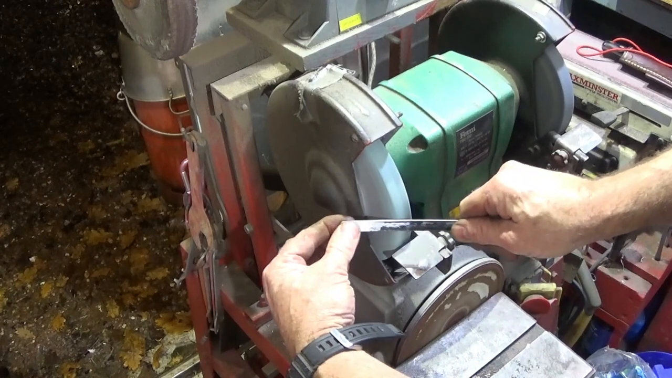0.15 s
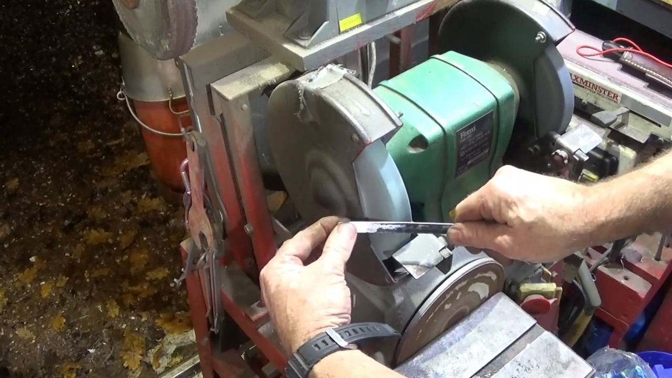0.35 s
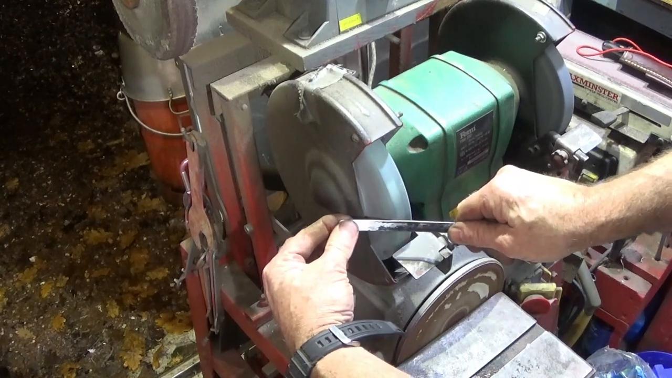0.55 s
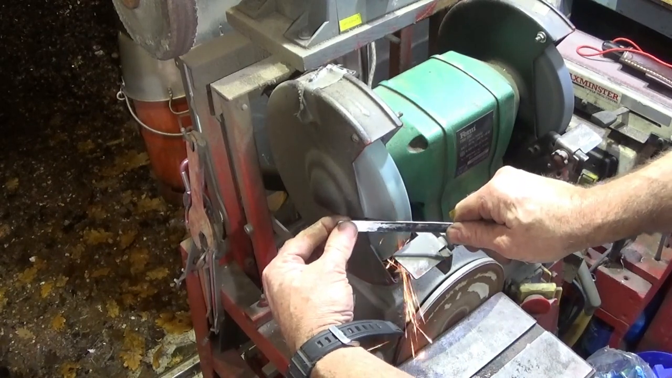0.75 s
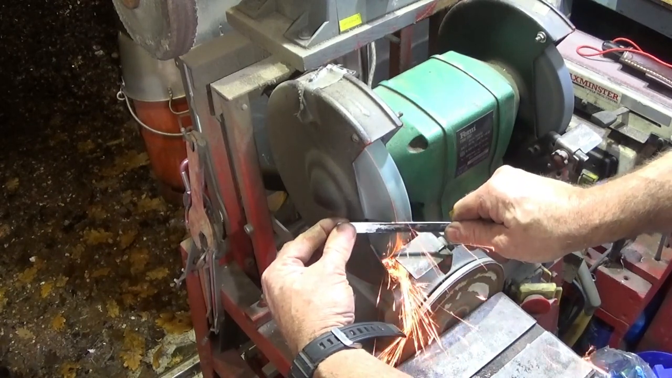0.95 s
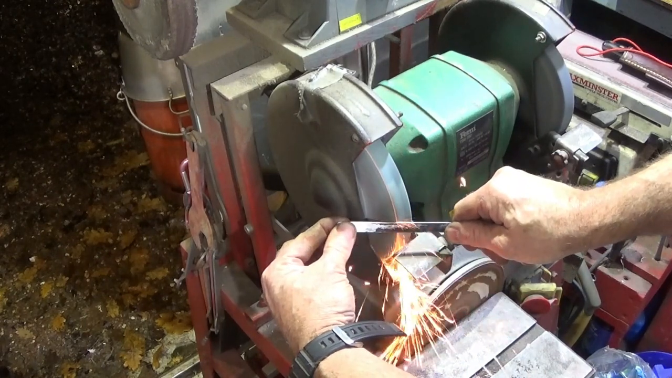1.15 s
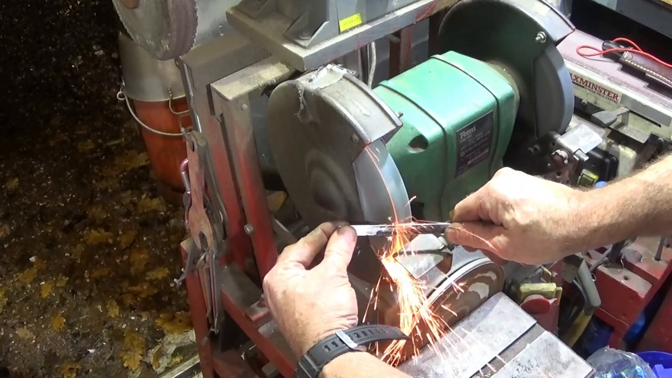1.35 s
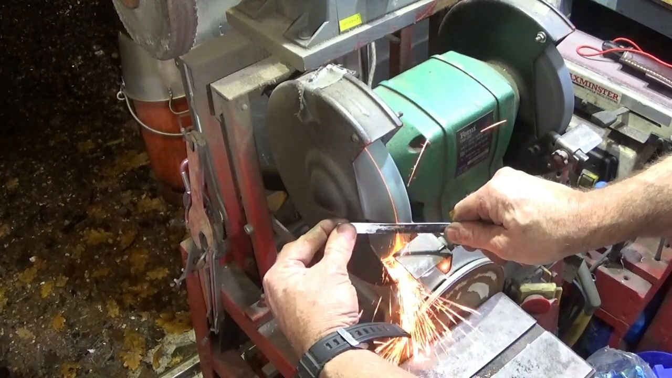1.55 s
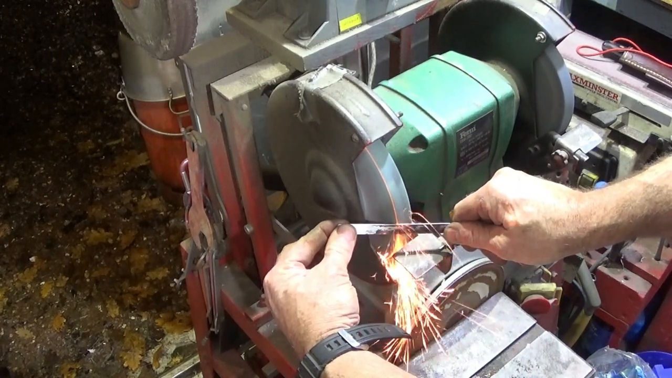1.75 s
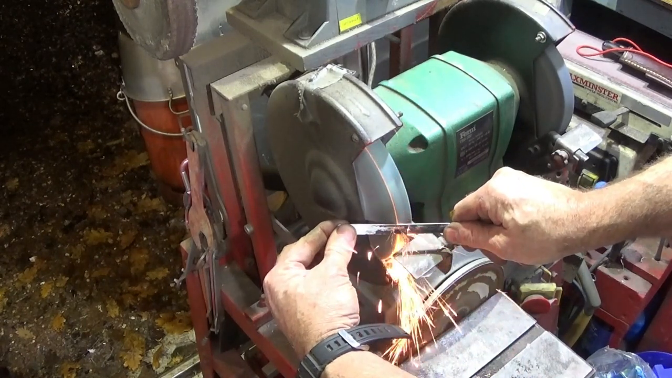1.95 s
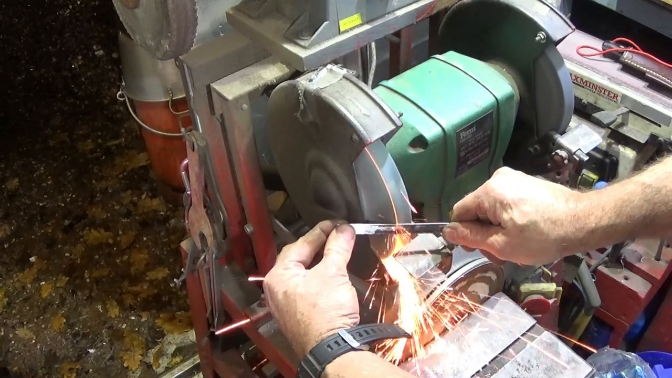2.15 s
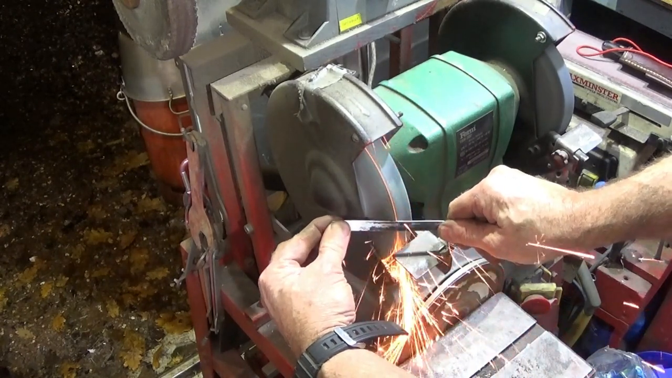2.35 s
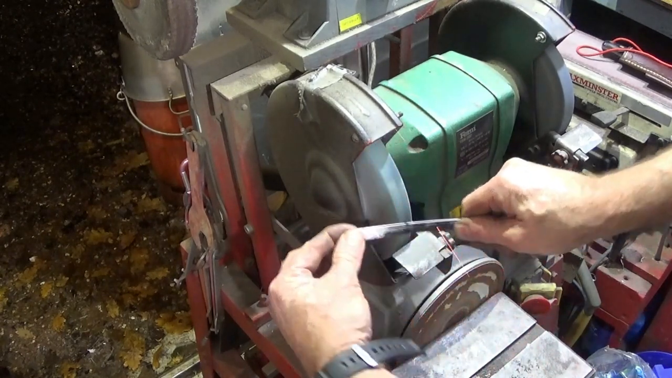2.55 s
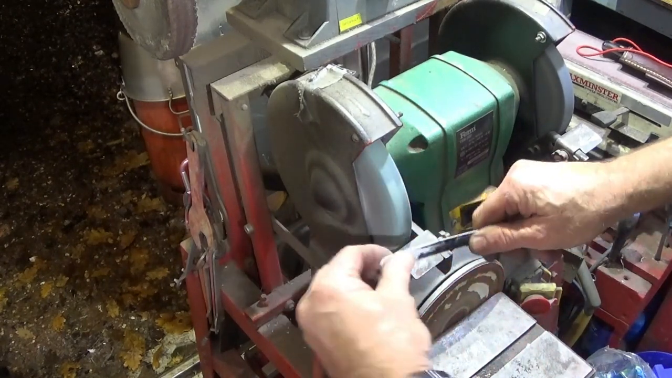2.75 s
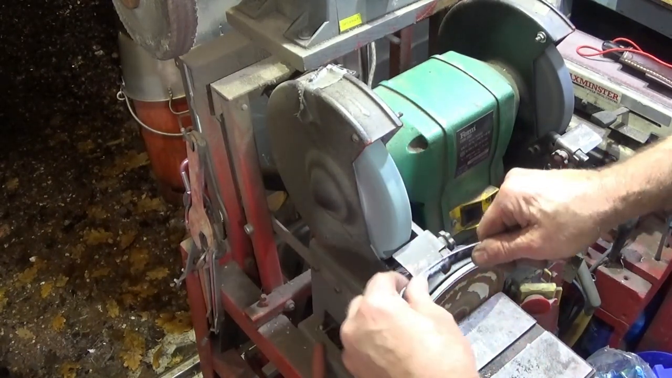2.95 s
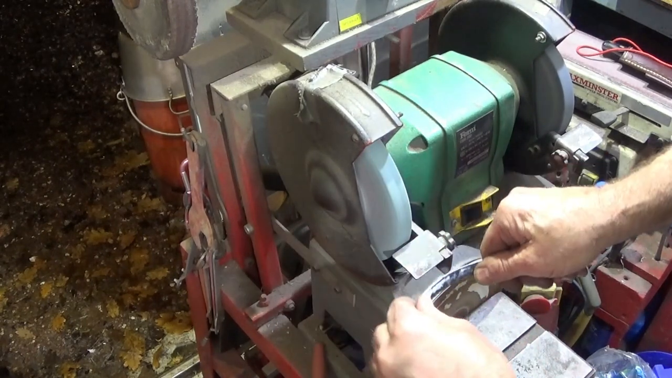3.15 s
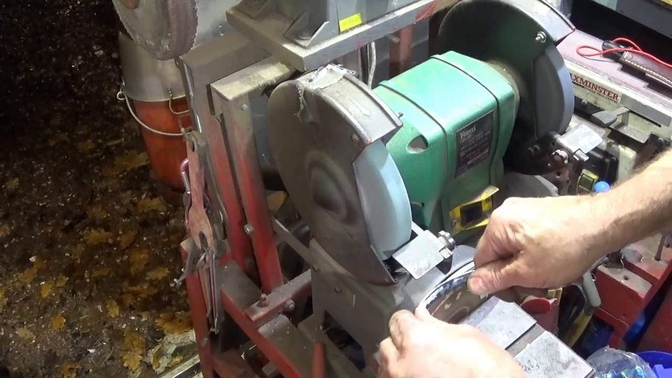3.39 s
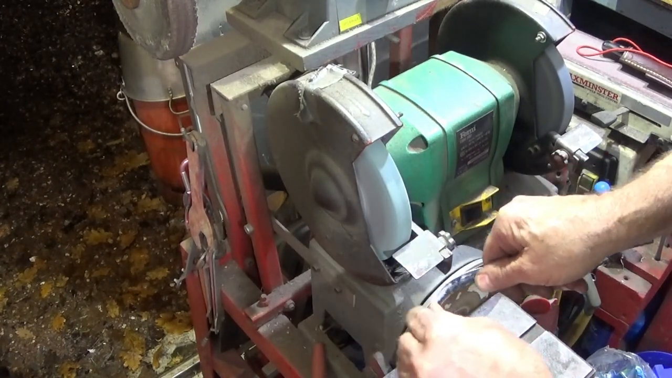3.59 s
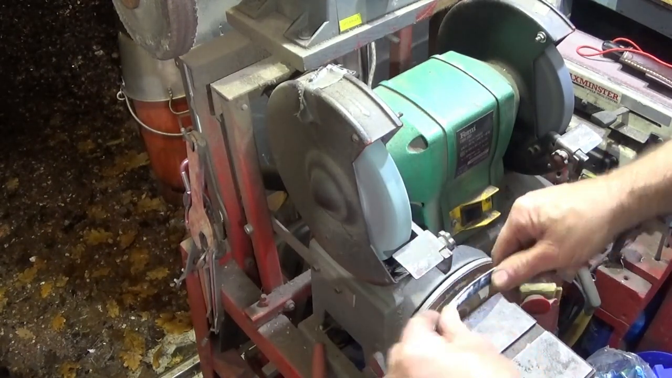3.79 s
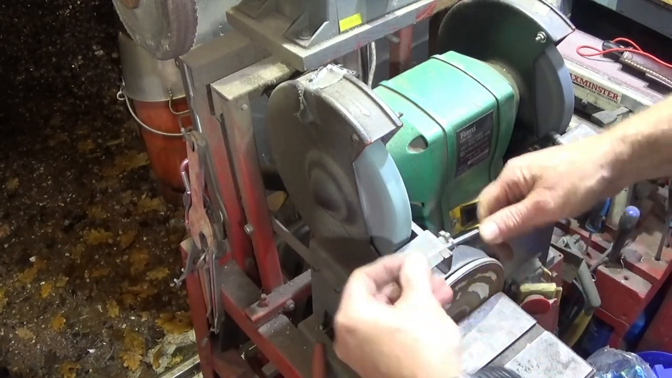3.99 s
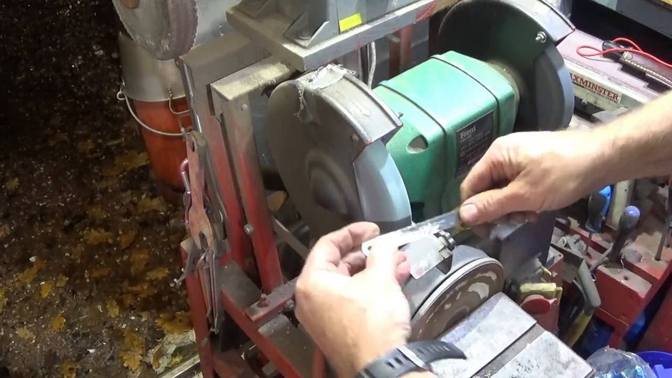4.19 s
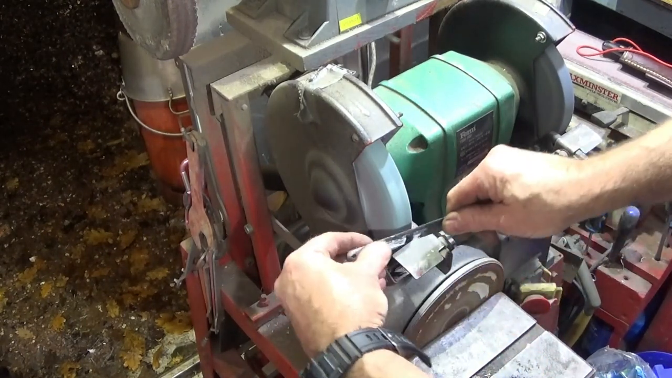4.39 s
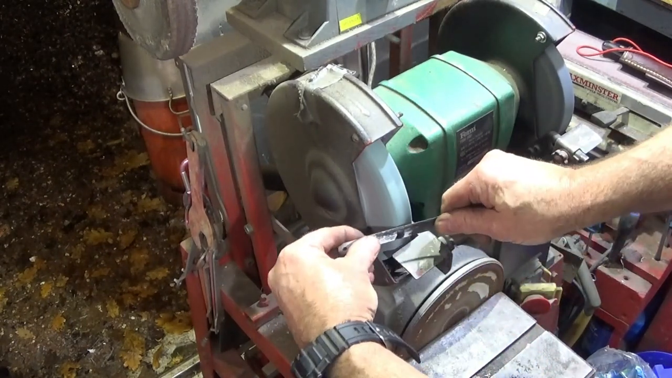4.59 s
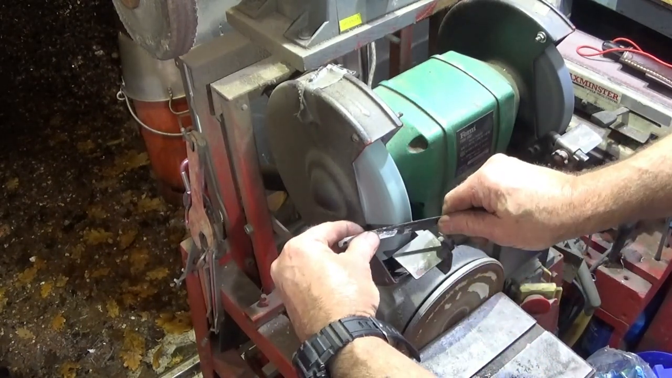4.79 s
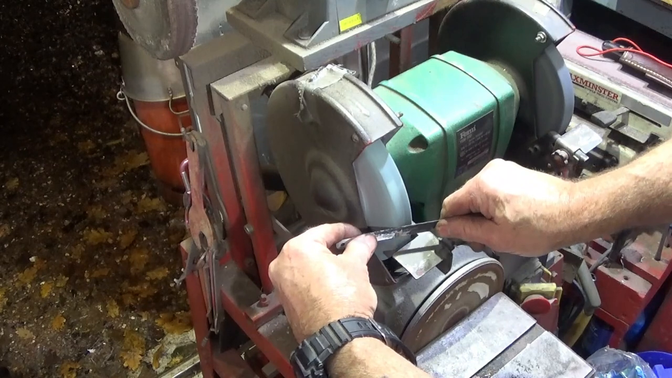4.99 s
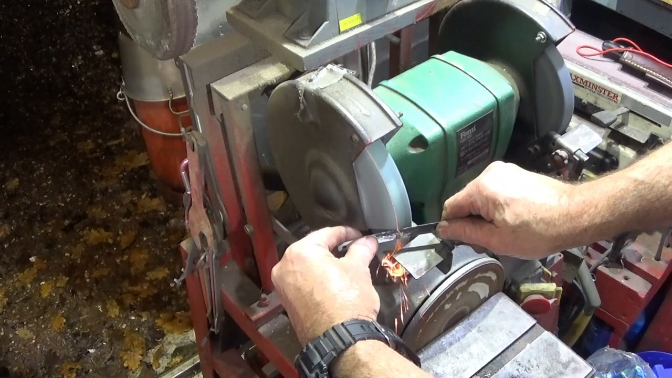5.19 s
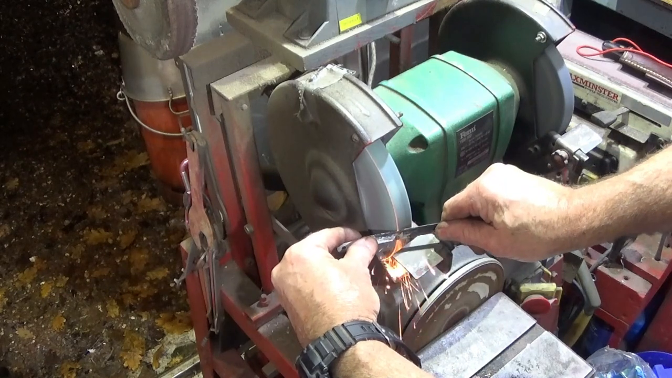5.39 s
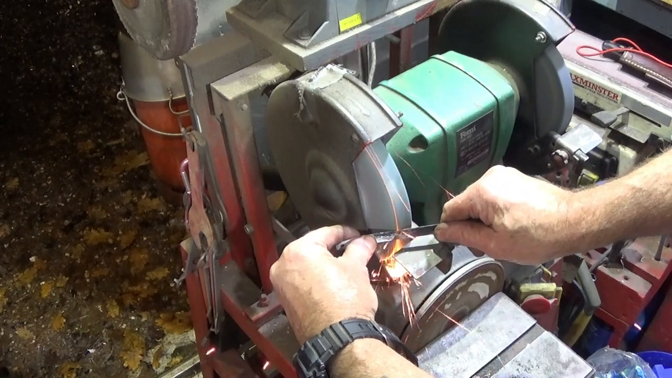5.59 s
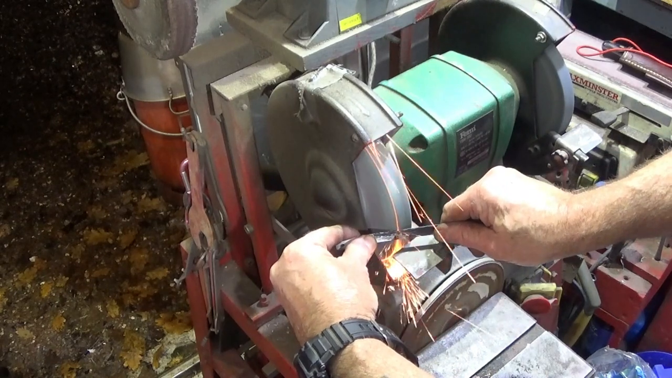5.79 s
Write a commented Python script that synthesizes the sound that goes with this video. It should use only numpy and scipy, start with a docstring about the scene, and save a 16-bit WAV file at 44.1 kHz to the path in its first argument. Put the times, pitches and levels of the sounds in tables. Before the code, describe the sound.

Close up in a small workshop, loose metal parts clatter as a bench grinder gathers speed. A steel blade is pressed to the wheel for about two seconds, making a bright, gritty hiss with singing overtones over the labouring motor. Then the grinder runs freely, humming and whirring, until the blade touches again for a brief, ringing scrape near the end.

```python
"""In a small workshop, a bench grinder speeds up, shaking its stand, then hums at about 50 turns a second.
A steel blade is pressed on the wheel twice. The same grit comes round every turn, scrapes the steel,
makes it ring and slows the motor a little. A camera close by turns its gain (its volume) down under
the hiss, then lets the motor swell back slowly."""
import sys
import numpy as np
from scipy import signal
from scipy.fft import rfft, irfft, next_fast_len
from scipy.io import wavfile
from scipy.ndimage import uniform_filter1d, map_coordinates

SR = 44100
rng = np.random.default_rng(int(sys.argv[2]) if len(sys.argv) > 2 else 0)


def master(y):
    """Save y as 16-bit WAV."""
    cut = np.clip(np.atleast_2d(y).T, -1, 1)
    pcm = np.round(cut * 32767)  # scale
    wavfile.write(sys.argv[1], SR, pcm.astype(np.int16))


N = 257103
T = np.arange(N) / SR
PADDED = next_fast_len(N + SR // 2, real=True)
BINS = np.maximum(np.arange(PADDED // 2 + 1) * SR / PADDED, 1)  # the filters' frequencies in Hz
FREE_SPEED = 49.7  # turns a second with nothing on the wheel
GRIT_EVENNESS = .4  # 0-1: how alike in strength the grit's overtones are

# High ringing of the sheet-metal covers: f/Hz, width/Hz, relative level/dB
COVER_MODES = [(6030, 510, 7), (6430, 170, 12.5), (7070, 210, 8.5), (9300, 820, -4.5), (10100, 380, -1)]


def undb(db):
    """Turn decibels into a number to multiply by."""
    return 10 ** (np.asarray(db) / 20)


def unit(x):
    """Scale a signal to an average strength (rms) of 1."""
    return x / np.sqrt(np.mean(x ** 2))


def gate(start, end, rise, fall):
    """One between two times, with sloping edges."""
    return np.clip((T - start) / rise, 0, 1) * np.clip((end - T) / fall, 0, 1)


def bell(x, centre, width):
    """A smooth rise to 1 at the centre and back."""
    return np.exp(-((x - centre) / width) ** 2)


def swells(x, rows):
    """Add up smooth rises and dips in dB from (centre, half width, dB) rows."""
    return sum(db * bell(x, centre, width) for centre, width, db in rows)


def shape(x, response):
    """Filter a signal: multiply each frequency in BINS by its response."""
    return irfft(rfft(x, PADDED) * response, PADDED)[:N]


def colour(x, points):
    """Filter along a curve through (Hz, dB) points."""
    hz, db = np.transpose(points)
    return shape(x, undb(np.interp(np.log(BINS), np.log(hz), db)))


def resonate(x, modes):
    """Ring an object at its modes, the pitches it favours: (Hz, width, dB) rows. The result has rms 1."""
    power = sum(undb(db) ** 2 / (1 + ((BINS ** 2 - hz ** 2) / (BINS * width)) ** 2) ** 2
                for hz, width, db in modes)
    return unit(shape(x, np.sqrt(power)))


def scatter(x, t60):
    """Smear a sound in time like many quick echoes, keeping its balance of low and high."""
    echoes = rng.standard_normal(N) * undb(-60 * np.minimum(T / t60, 2))
    response = rfft(echoes, PADDED)
    return shape(x, response / np.abs(response))


def track(turns, life, size, even=0):
    """A ring of `size` random bumps, met again each turn and slowly renewed over `life` turns."""
    keep = np.exp(-1 / life)
    fresh = rng.standard_normal((int(turns[-1]) + 2, size))
    initial = keep * rng.standard_normal((1, size))
    worn = signal.lfilter([np.sqrt(1 - keep ** 2)], [1, -keep], fresh, axis=0, zi=initial)[0]
    if even:  # make the overtones more alike in strength
        harmonics = rfft(worn)
        worn = irfft(harmonics / np.abs(harmonics) ** even, size)
    return unit(map_coordinates(worn.ravel(), [turns * size], order=3, mode="nearest"))


def roughness(turns, repeat, life, bumps_db, even=0):
    """Force from a rough, turning surface: a share repeats each turn, and high spots press harder."""
    repeat = np.clip(repeat, 0, 1)
    repeating = np.sqrt(repeat) * track(turns, life, size=800, even=even)
    fresh = np.sqrt(1 - repeat) * rng.standard_normal(N)
    return unit((repeating + fresh) * undb(bumps_db * track(turns, life, size=20)))


def tone(turns, multiple, waver):
    """A slightly unsteady tone at a multiple of the shaft's speed, with rms 1."""
    slow_turns = turns[::128] / 4
    drift = track(slow_turns, 0.77, size=1) + 1j * track(slow_turns, 0.67, size=1)
    flutter = np.interp(T, T[::128], drift)
    angle = 2 * np.pi * (multiple * turns + multiple ** 2 / np.pi)
    return unit(np.real((1 + waver * flutter) * np.exp(1j * angle)))


def lag(x, seconds):
    """Follow a change gradually."""
    keep = np.exp(-1 / (seconds * SR))
    return signal.lfilter([1 - keep], [1, -keep], x)


def shaft(load):
    """Turns a second: the shaft speeds up evenly and settles; load slows the heavy wheels gradually."""
    slip, knee = 1.3, .5  # turns a second: lost at full load; softness of the settling
    settled = FREE_SPEED - slip * lag(load, seconds=.2)
    rising = 27 + 20 * T
    return -knee * np.logaddexp(-rising / knee, -settled / knee)


def starting():
    """One while the motor's starting coil pulls, fading to zero as it drops out."""
    off_s, fade_s = 0.923, 0.099
    return np.clip((off_s - T) / fade_s, 0, 1)


def bearings(turns, speed, contact):
    """Bearings ring the housing, covers and guards: louder with speed, quieter while the blade hisses."""
    # How the motor's housing colours the noise: f/Hz, relative level/dB
    housing_curve = [(310, -55), (520, -18.5), (600, -7.5), (664, -4.5), (991, -8.5), (1080, -5.5),
                     (1570, -4), (1680, -5), (1840, -5.5), (2800, -10), (4160, -13.5), (5400, -16),
                     (6390, -17.5), (8390, -19), (11300, -16), (12300, -25.5), (14900, -35.5), (16000, -58)]
    # Low ringing of the wheel guards: f/Hz, width/Hz, relative level/dB
    guard_modes = [(320, 100, -11.5), (373, 120, -5), (379.3, 10, 2), (434, 39, 0.5)]
    # The guards' ringing swells and eases: t/s, half length/s, rise/dB
    guard_swells = [(0.687, 0.08, 5), (2.74, 0.13, 3.5), (4.8, 0.85, 1)]
    rolling = roughness(turns, repeat=0.2, life=29, bumps_db=1.58)
    housing = unit(colour(rolling, housing_curve)) + undb(-12) * resonate(rolling, COVER_MODES)
    housing *= undb(-3 - 5 * contact)
    guards = resonate(roughness(turns, repeat=0.41, life=23, bumps_db=1.5), guard_modes)
    guards *= undb(-5 - 4.5 * contact + swells(T, guard_swells))
    rumble = undb(-28) * resonate(rng.standard_normal(N), [(190, 590, 0)])
    return (housing + guards + rumble) * undb(-18) * (speed / FREE_SPEED) ** 4


def stand(turns, speed):
    """The shaft shakes the stand, whose modes each change in strength near one speed; loose parts tick."""
    # The stand's modes, the last one its rattle:
    # f/Hz, width/Hz, level/dB, critical speed/(turns/s), half width/(turns/s), change there/dB
    stand_modes = [(60, 35, -52.5, 36.5, 2.4, 7), (122, 14, -50.5, 39.7, 2.8, 6.5),
                   (276, 120, -41, 36.3, 2.5, 5.5), (407.7, 55, -23.5, 42.5, 3.5, 1),
                   (690, 49, -30.5, 39, 4.5, -3.5), (849, 77, -38, 35, 4.6, 11),
                   (970, 64, -39, 38, 2.3, 7.5), (1250, 940, -33, 35.8, 2.1, 6)]
    smooth = roughness(turns, repeat=0.49, life=35, bumps_db=3.0)
    loose = roughness(turns, repeat=0.22, life=0.46, bumps_db=1.5)
    forces = [smooth] * (len(stand_modes) - 1) + [loose]
    shaking = sum(resonate(force, [(hz, width, 0)]) * undb(db + swells(speed, [critical]))
                  for (hz, width, db, *critical), force in zip(stand_modes, forces))
    ticks = undb(-38) * resonate(loose, [(4000, 4400, 0.0055)] + COVER_MODES)
    return shaking + ticks


def clicks(per_second=150):
    """Loose parts tap at random, making fine, bright clicks."""
    taps = (rng.random(N) < per_second / SR) * rng.standard_normal(N)
    return undb(-46) * resonate(scatter(taps, t60=0.017), [(8600, 2100, 0)])


def buzz(speed):
    """The motor's coils give a low buzz that grows with speed."""
    coils = resonate(rng.standard_normal(N), [(112, 31, -0.55), (188, 26, -1.4)])
    return undb(-49) * coils * speed / FREE_SPEED


def clacks(rise_s=0.0013, decay_s=0.0068):
    """Each knock of a loose part is a short clatter of sheet metal with a bright tick on top."""
    # Knocks while the motor speeds up: t/s, clatter level/dB, tick level/dB
    knocks = [(0.021, -28, -43), (0.061, -28.5, -41), (0.141, -25.5, -35), (0.163, -31, -32),
              (0.18, -24, -42), (0.217, -26, -43), (0.254, -27, -32), (0.347, -31, -35), (0.376, -26, -33),
              (0.402, -25, -28), (0.427, -24, -40), (0.439, -22.5, -33), (0.465, -22.5, -34),
              (0.492, -30, -33), (0.517, -25, -28), (0.544, -28, -40), (0.572, -26, -39), (0.59, -29, -27),
              (0.67, -31, -36), (0.685, -31, -40)]
    clatter = resonate(rng.standard_normal(N), [(1580, 2100, 0.25), (4060, 3800, -1.2)])
    tick = resonate(rng.standard_normal(N), [(6300, 1900, 0), (9500, 2600, 0)])
    out = 0
    for at, db, tick_db in knocks:
        rise = np.clip((T - at) / rise_s, 0, 1)
        decay = np.exp(-np.maximum(T - at - rise_s, 0) / decay_s)
        out += rise * decay * (undb(db) * clatter + undb(tick_db) * tick)
    return out


def jolts(ring_hz=409, half_length_s=0.0064):
    """The stand jolts against the bench and rings for an instant."""
    # Bumps against the bench: t/s, level/dB
    bumps = [(0.035, -19), (0.078, -13), (0.221, -29), (0.481, -11), (0.615, -22), (0.647, -18.5),
             (0.687, -17), (0.711, -12), (0.734, -16.5)]
    return sum(undb(db) * bell(T, at, half_length_s)
               * unit(np.sin(2 * np.pi * (ring_hz * T + rng.random()))) for at, db in bumps)


def passing_tones(turns):
    """Single tones swell and fade, most of them as the rising speed sweeps them past a resonance."""
    # Swelling motor tones: multiple of shaft speed, t/s, half length/s, level/dB
    tones = [(23.8, 0.055, 0.055, -23), (27, 0.19, 0.05, -22.5), (20.6, 0.24, 0.065, -23),
             (23.6, 0.326, .04, -23), (25.9, 0.36, 0.04, -24), (24, 0.422, 0.035, -21),
             (48.5, 0.4, 0.03, -31), (26.5, 0.49, 0.044, -27), (21.25, 0.63, 0.045, -26),
             (34, 4.0, 0.75, -27.5), (7.31, 3.95, 0.49, -25)]
    judder = .003 * starting() * track(turns, 0.85, size=5)  # the starting coil turns the shaft unevenly
    flutter = undb(2 * starting() * track(turns, 1, size=4))
    return flutter * sum(undb(db) * bell(T, at, length) * tone(turns + judder, k, waver=0.24)
                         for k, at, length, db in tones)


def hand(touch_s=0.013, lift_s=0.0304, rest_s=0.026):
    """The hand sets the blade on the wheel, loads the motor gradually and slides along the edge."""
    # Strokes of the blade: start/s, end/s, level/dB, level change/(dB/s), motor load (0-1),
    # load build-up/s, first spot, last spot, slide curve (1 is even, more slides later)
    strokes = [(0.725, 2.55, -9, -2, 0.99, .3, 0, 1.83, 1.63),
               (5.107, 5.903, -11.5, 10.5, 0.72, .6, 3.5, 4.58, 2.3)]
    # The hand pushes harder or gives way for a moment: t/s, half length/s, change/dB
    pushes = [(1.16, 0.32, 5.5), (1.593, 0.096, 4), (2.464, 0.39, 8), (5.167, 0.0067, -4),
              (5.2, 0.0088, -4.5)]
    contact = pressure = load = place = 0
    for start, end, db, db_per_s, weight, build, first, last, curve in strokes:
        touch = gate(start, end, touch_s, lift_s)
        contact += touch
        pressure += touch * undb(db + db_per_s * (T - start) + swells(T, pushes))
        load += weight * gate(start, end, build, lift_s)
        slid = np.clip((T - start) / (end - rest_s - start), 0, 1) ** curve
        place = np.where(T >= start, first + (last - first) * slid, place)
    return contact, pressure, load, place


def blade_ring(turns, load, place):
    """Grit rings the blade; each spot along the edge sounds different as it meets the wheel."""
    # The blade's modes at spots 0 to 4: f/Hz, width/Hz, relative level/dB
    spot_0 = [(4850, 560, -18), (5810, 150, 3), (6200, 410, 2), (6780, 580, 1.5), (7650, 1100, -3.5),
              (8850, 460, 4), (9710, 480, 7), (10040, 220, 7), (10970, 760, 1), (11900, 1200, -2)]
    spot_1 = [(6230, 600, 2), (7140, 950, 4), (8350, 1700, -2), (9100, 670, 7.5), (10100, 1500, -3.5),
              (11070, 1700, 4.5), (12700, 1200, -7), (15300, 1200, -6)]
    spot_2 = [(3950, 390, -9), (4860, 900, -12), (6500, 590, 1), (7080, 640, 6), (8100, 2400, -2),
              (10300, 490, -3), (10800, 2100, -5.5)]
    spot_3 = [(3550, 110, -7.5), (4100, 190, -6), (4620, 260, -10), (5000, 160, -14.5), (6400, 200, -13),
              (7070, 150, 3), (7470, 140, 5), (7850, 290, 4), (8200, 400, -3), (9400, 350, -6),
              (9900, 300, -3), (10420, 330, 3)]
    spot_4 = [(4030, 1000, -8), (5700, 1050, -4), (7400, 330, 2), (7670, 1150, 6), (8650, 900, 0),
              (9600, 400, 2), (10200, 390, -4), (10800, 6700, -11)]
    fresh, bedded = 0.42, 0.88  # more of the grit pattern repeats as the edge beds in
    repeat = fresh + (bedded - fresh) * lag(load, seconds=0.5) ** 2
    force = roughness(turns, repeat, life=43, bumps_db=1.5, even=GRIT_EVENNESS)
    return sum(np.clip(1 - abs(place - k), 0, 1) * resonate(force, modes)
               for k, modes in enumerate([spot_0, spot_1, spot_2, spot_3, spot_4]))


def scrape(turns):
    """Grit tears at the steel with a broad hiss."""
    # Colour of grit on steel: f/Hz, relative level/dB
    scrape_curve = [(500, -9.5), (1200, 6.5), (2200, -4), (3100, 0), (5000, 9), (11500, 7.5), (13700, 1.5),
                    (15400, 7.5), (16000, -8)]
    grit = roughness(turns, repeat=0.72, life=46, bumps_db=4.0, even=GRIT_EVENNESS)
    return undb(-10) * unit(colour(grit, scrape_curve))


def growl(turns, load):
    """The wheel rasps lower down, louder as the load grows."""
    # Low rasp of the loaded wheel: f/Hz, width/Hz, relative level/dB
    rasp_modes = [(2490, 3000, 0.5), (1550, 1700, 1)]
    # The wheel bites deeper: t/s, half length/s, rise/dB
    bites = [(1.81, 0.2, 4), (2.102, 0.057, 3.5)]
    coarse = roughness(turns, repeat=.92, life=70, bumps_db=2.5, even=GRIT_EVENNESS)
    return undb(-28 + swells(T, bites)) * load ** 1.6 * resonate(coarse, rasp_modes)


def hum(turns, contact):
    """The unbalanced shaft hums; the hum drops while the blade hisses and returns when it lifts."""
    # Tones of the shaft: multiple of shaft speed, relative level/dB
    shaft_tones = [(1, -52), (3, -55), (4, -46.5), (5, -59), (6, -58), (7, -35), (8, -31.5), (9, -36.5),
                   (13, -41.5), (14, -39.5), (15, -45), (17, -41), (18, -54), (19, -47), (20, -44.5),
                   (22, -43.5), (26, -43.5), (35, -43)]
    # Ball-bearing tones that fall between those and beat with them: multiple, relative level/dB
    ball_tones = [(6.12, -48.5), (7.35, -39), (8.65, -39)]
    tones = sum(undb(db) * tone(turns, k, waver=0.11) for k, db in shaft_tones + ball_tones)
    return tones * gate(0.75, 7, 0.13, .1) * undb(6.5 - 11 * contact)


def strain(turns, load, start_s=0.97, rise_s=0.29):
    """Once up to speed, the motor labours against the blade with a low drone and a whine."""
    # The drone swells and sinks as the blade bears on the wheel: t/s, half length/s, change/dB
    drone_swells = [(1.27, 0.04, -9), (1.735, 0.37, 12), (2.43, 0.03, -9), (2.52, 0.05, 6)]
    # So does the whine: t/s, half length/s, change/dB
    whine_swells = [(1.23, 0.025, 3), (1.62, 0.07, -4), (1.78, 0.07, 2.5), (2.1, 0.07, 1),
                    (2.33, 0.06, 1.5), (2.52, 0.055, 7)]
    # Tones of the whine: multiple of shaft speed, relative level/dB
    whine_tones = [(9, -8), (20, 1.5), (21, -14), (25, -12), (30, -7.5), (41, -12), (49, -12), (57, -9)]
    # Drone and whine dip briefly: t/s, half length/s, change/dB
    dips = [(1.916, 0.017, -13.5), (2.197, 0.024, -17)]
    drone = undb(-28 + swells(T, drone_swells)) * tone(turns, 8, waver=0.065)
    whine = sum(undb(db) * tone(turns, k, waver=0.18) for k, db in whine_tones)
    whine *= undb(-29.5 + swells(T, whine_swells))
    fade_in = np.clip((T - start_s) / rise_s, 0, 1)
    return (drone + whine) * load * undb(swells(T, dips)) * fade_in


def catches(turns):
    """The edge catches on the wheel and rasps or squeals, bouncing once a turn."""
    # Catches of the edge: t/s, half length/s, f/Hz, width/Hz, relative level/dB
    squeals = [(1.12, 0.04, 4950, 600, -19), (1.23, 0.06, 4700, 900, -17), (1.62, 0.15, 4700, 950, -14.5),
               (1.96, 0.22, 4600, 1000, -13.5), (2.42, 0.06, 4050, 450, -20), (5.15, 0.19, 5600, 230, -7.5),
               (5.2, 0.1, 9300, 130, -14), (5.48, 0.2, 5620, 240, -9.5), (5.47, 0.08, 10370, 130, -9),
               (5.794, 0.11, 2300, 420, -16)]
    bounce = unit(undb(np.cos(2 * np.pi * turns)))  # 1 dB up and down
    snag = bounce * roughness(turns, repeat=.8, life=29, bumps_db=-0.5, even=GRIT_EVENNESS)
    return sum(undb(db) * bell(T, at, length) * resonate(snag, [(hz, width, 0)])
               for at, length, hz, width, db in squeals)


def sing(turns, contact):
    """Under steady pressure the steel sings thin, high notes that follow the wheel's speed."""
    # Notes of the blade: multiple of shaft speed, t/s, half length/s, level/dB
    notes = [(128.3, 1.6, 0.58, -23), (133.5, 3.2, 0.87, -18), (134, 1.7, 0.4, -22),
             (157.5, 1.8, 0.46, -28), (168, 1.6, .45, -25), (185, 1.88, 0.29, -14.5), (201, 1.9, 0.27, -21),
             (145, 2.16, 0.069, -26), (82, 5.46, 0.2, -25), (158, 5.3, 0.1, -18), (152, 5.64, 0.1, -24)]
    return contact * sum(undb(db) * bell(T, at, length) * tone(turns, k, waver=0.31)
                         for k, at, length, db in notes)


def floor_spread(shaking):
    """The whole stand and the floor give off the shaking, so its bass sounds wide."""
    # Stereo width of the shaking: f/Hz, side level relative to the shaking/dB
    width_curve = [(60, -12), (160, -1), (260, -6), (400, -9), (800, -9), (3000, -10), (8000, -21)]
    side = colour(scatter(shaking, t60=0.086), width_curve)
    return np.array([side, -side])


def workshop(x):
    """Guard and bench echo the treble at once; later wall echoes differ at the two microphones."""
    # Stereo width of the sound, narrow in the bass and mono in the highest treble: f/Hz, side level/dB
    width_curve = [(40, -29), (65, -32), (125, -35), (350, -18.5), (700, -11), (1400, -12), (2800, -14.5),
                   (5000, -18), (6500, -14.5), (9000, -14.5), (11500, -13.5), (14000, -59)]
    # Balance at the microphones: f/Hz, left minus right/dB
    balance = [(30, -3), (70, 7.5), (170, 3), (350, 0.5), (700, -1), (1400, -0.3), (10000, -0.6)]
    near = colour(scatter(x, t60=0.055), [(1000, -7.5), (4000, 0.0)])
    mid = x + undb(-9.5) * near
    side = colour(scatter(x, t60=0.17), width_curve)
    left = colour(mid + side, [(hz, db / 2) for hz, db in balance])
    right = colour(mid - side, [(hz, -db / 2) for hz, db in balance])
    return np.array([left, right])


def gain_control(x, limit_db, ratio, recover_db_per_s, lag_s):
    """Treble above the limit pulls the volume down after a short lag; then it creeps back up."""
    treble = np.diff(x.mean(axis=0), prepend=0)
    heard_db = 10 * np.log10(np.abs(uniform_filter1d(treble ** 2, SR // 40)) + 1e-12)
    over_db = np.maximum(heard_db - limit_db, 0) * (1 - 1 / ratio)
    recovery_db = recover_db_per_s * T
    cut_db = np.maximum.accumulate(over_db + recovery_db) - recovery_db
    return x * undb(-np.interp(T - lag_s, T, cut_db))


def scene():
    """The motor runs throughout: it shakes its stand at first and grinds the blade twice."""
    contact, pressure, load, place = hand()
    speed = shaft(load)
    turns = np.cumsum(speed) / SR
    shaking = (stand(turns, speed) + jolts() + clicks() + buzz(speed)) * starting() + clacks()
    wide = floor_spread(shaking)
    motor = bearings(turns, speed, contact) + hum(turns, contact) + passing_tones(turns)
    motor += strain(turns, load)
    hiss = blade_ring(turns, load, place) + scrape(turns) + catches(turns)
    tremor = undb(0.61 * track(turns / 3, 0.34, size=1))  # the hiss flickers slightly
    grinding = hiss * pressure * tremor + growl(turns, load) + sing(turns, contact)
    return workshop(motor + shaking + grinding) + wide


def record(dry):
    """The camera holds loud hiss down and cuts off the very highest treble."""
    held = gain_control(dry, limit_db=-19.5, ratio=5.1, recover_db_per_s=3.0, lag_s=0.0024)
    top_hz = 15750
    return signal.sosfilt(signal.ellip(10, .2, 80, top_hz, fs=SR, output="sos"), held)


dry = scene()
out = record(dry)
master(out)
```